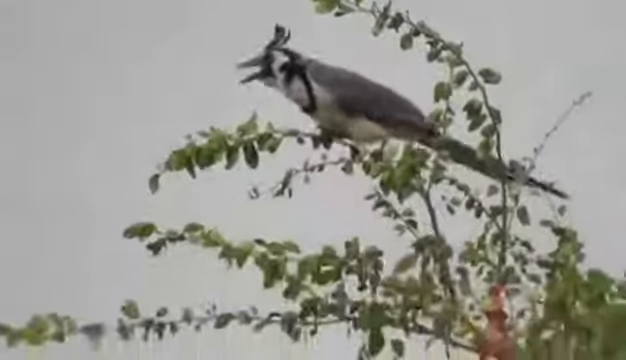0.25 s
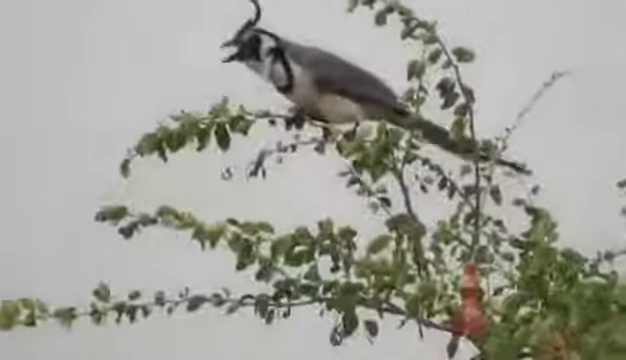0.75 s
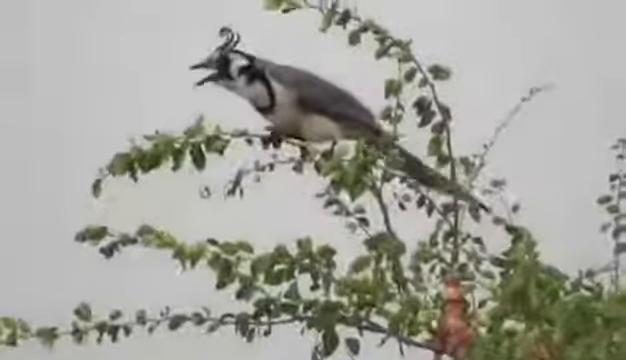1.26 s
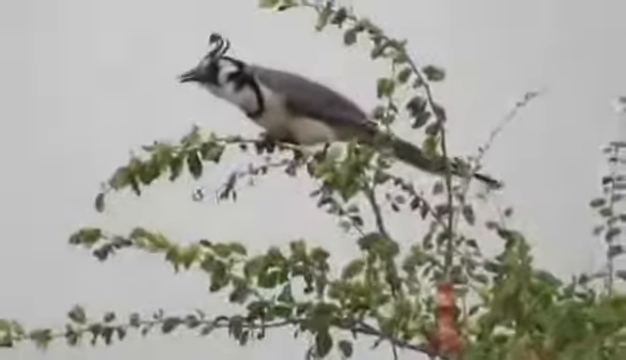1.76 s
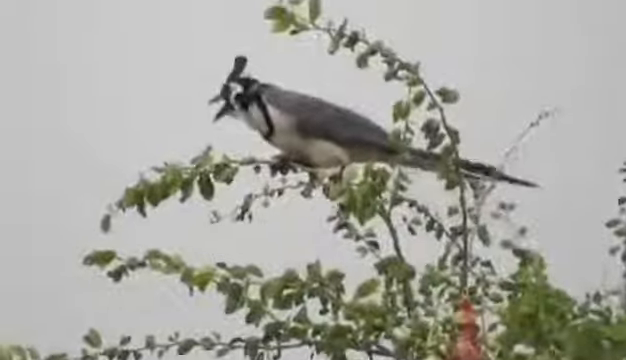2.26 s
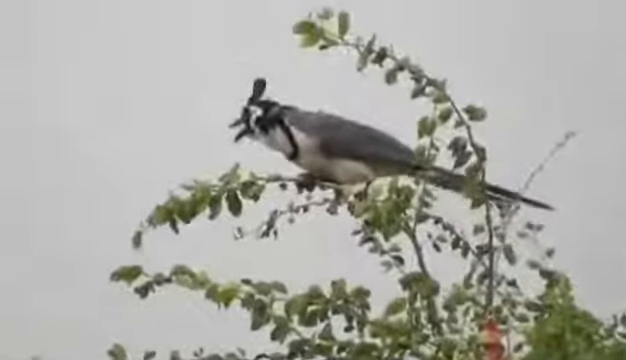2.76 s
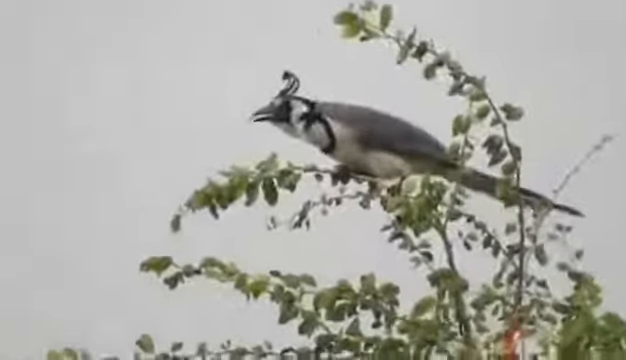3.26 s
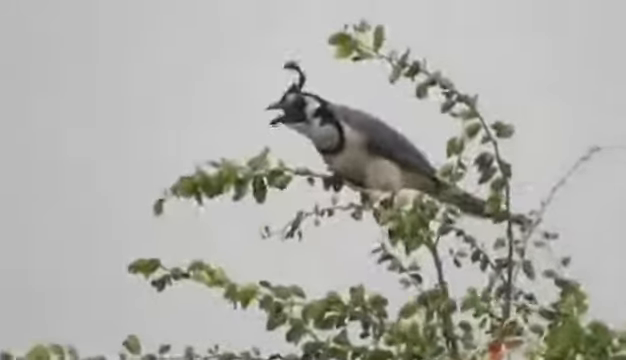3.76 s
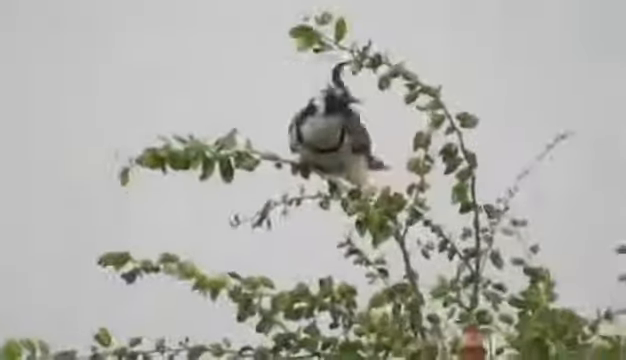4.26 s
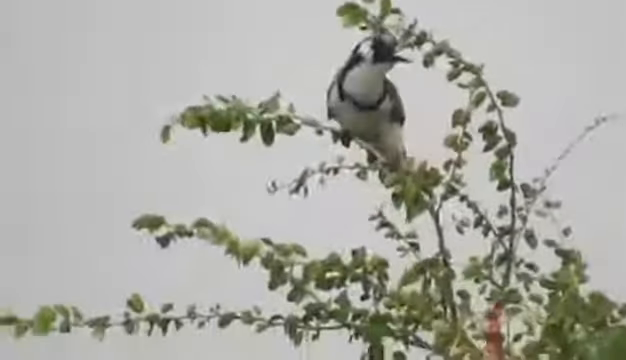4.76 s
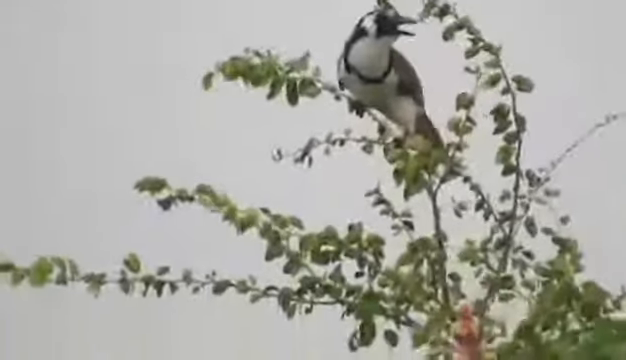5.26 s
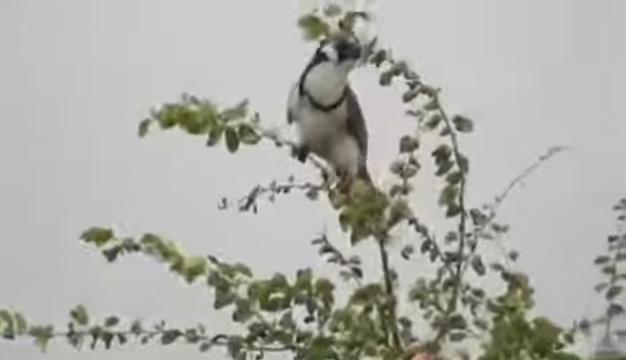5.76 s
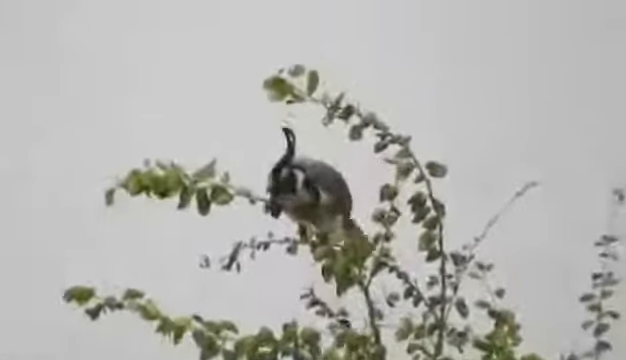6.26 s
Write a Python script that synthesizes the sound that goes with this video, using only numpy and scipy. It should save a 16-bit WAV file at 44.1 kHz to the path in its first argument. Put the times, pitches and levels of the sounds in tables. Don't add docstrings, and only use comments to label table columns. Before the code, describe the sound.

A jay on a treetop gives short, scratchy, nasal calls, each a whistle roughened by fast flutter and breath, with brief uneven pauses. A soft echo comes off the trees. Far insects hiss, machinery hums hollowly and traffic swells low. After about three seconds wind begins thudding and rumbling on the handheld microphone; the background sinks and the last calls become weaker.

```python
import sys
import numpy as np
from scipy import signal
from scipy.fft import rfft, irfft, next_fast_len
from scipy.io import wavfile
from scipy.ndimage import uniform_filter1d, map_coordinates

SR = 44100
rng = np.random.default_rng(int(sys.argv[2]) if len(sys.argv) > 2 else 0)


def undo_db(level):
    steps = np.asarray(level, float) / 20
    return 10 ** steps


def master(y):
    cut = np.clip(np.atleast_2d(y).T, -1, 1)
    pcm = np.round(cut * 32767)
    wavfile.write(sys.argv[1], SR, pcm.astype(np.int16))


N = 286650


def unit(x):
    return x / np.sqrt(np.mean(x ** 2) + 1e-20)


def along(points, hz):
    f, v = np.transpose(points)
    return np.interp(np.log(hz + 1), np.log(f + 1), v)


def curves(rows):
    s, *cols = np.transpose(rows)
    return [np.interp(np.arange(N) / SR, s, c) for c in cols]


def wobble(rate):
    return unit(map_coordinates(rng.standard_normal(N // 10), [np.arange(N) * rate / SR], order=1))


def filtered(x, response):
    m = next_fast_len(N + SR // 2)
    return irfft(rfft(x, m) * response(np.fft.rfftfreq(m, 1 / SR)), m)[..., :N]


def rush(response, patchy_db):
    z = signal.stft(rng.standard_normal(N), nperseg=512)[2]
    field = uniform_filter1d(rng.standard_normal(z.shape), size=5, axis=0)
    field = uniform_filter1d(field, size=10, axis=1)
    patchy = signal.istft(z * undo_db(patchy_db * unit(field)), nperseg=512)[1][:N]
    return unit(filtered(patchy, response))


def coloured(spectrum):
    return lambda hz: undo_db(along(spectrum, hz))


def dips(rows):
    return lambda hz: undo_db(-sum(db * np.exp(-((hz - c) / w) ** 2) for c, w, db in rows))


def hollow(modes):
    def response(f):
        return sum((-1) ** k * undo_db(db) * 1j * f * w / (c * c - f * f + 1j * f * w)
                   for k, (c, w, db) in enumerate(modes))
    return response


# t/s, length/s, whistle level/dB, top f/Hz, rasp over whistle level/dB
CALLS = [
    (-0.055, 0.34, -38, 2800, -0.5),
    (0.438, 0.27, -36.5, 2760, -1.5),
    (1.0, 0.27, -36, 2700, -1.5),
    (1.591, .279, -35.5, 2750, -3),
    (2.51, .31, -38, 2720, -2.5),
    (3.038, 0.28, -37.5, 2700, -5),
    (3.895, .315, -35, 2786, 0),
    (4.473, .287, -43.5, 2650, -3.5),
    (5.06, .26, -48, 2590, -1.5),
    (5.545, 0.26, -46, 2540, -6.5),
]


def phrasing(t):
    rows = np.array(CALLS)
    latest = np.clip(np.searchsorted(rows[:, 0], t + .01) - 1, 0, None)
    start, length, level_db, top_hz, rasp_over_db = rows[latest].T
    since = np.maximum(t - start, 0)
    rise_s, top_at = .11, .38
    before = np.clip(1 - since / rise_s, 0, 1)
    after = np.clip((since / length - top_at) / (1 - top_at), 0, 1)
    release = np.clip(1 - (length - since) / .063, 0, 1)

    def lead_in(attack_s):
        return np.clip(1 - since / attack_s, 0, 1)

    attack_s, start_pitch, end_hz = .035, .64, 2380
    climb = (1 - start_pitch) * before ** 2.5
    hang = .06 * np.sin(np.pi * lead_in(attack_s + .008))
    sag_hz = (top_hz - end_hz) * np.sin(np.pi / 2 * np.minimum(after / .85, 1)) ** 2
    hz = top_hz * (1 - climb - hang) - sag_hz
    tone_db = level_db - 12 * lead_in(attack_s) ** .35 - 2.5 * after ** 2 - 18.5 * release
    low_db = level_db - 7 - 8 * lead_in(.01) - 10.5 * release
    rasp_db = level_db + rasp_over_db - 10.5 * lead_in(.084) - 13.5 * after ** 2 - release
    return tone_db, hz, low_db, rasp_db


# multiple of the pitch, level/dB
OVERTONES = [(1, 0), (2, -11), (3, -29), (4, -29)]


def whistle(phase, tone_db, rasp_db, opening):
    strength = unit(opening * undo_db(1.6 * wobble(450) + .8 * wobble(70)))
    tone = undo_db(tone_db + 3.0) * np.sin(phase)
    for k, db in OVERTONES[1:]:
        tone = tone + undo_db(rasp_db + 10 + db + 1.5 * wobble(300)) * np.sin(k * phase)
    return strength * tone


LOW_VOICE = [(0, 0.74), (.5, 0.85), (1, 0.77)]


def low_voice(hz, bend, low_db, gone, cycle):
    low_hz = hz * np.interp(gone, *np.transpose(LOW_VOICE)) * (1 + 1.5 * bend + .03 * wobble(400))
    phase = 2 * np.pi * np.cumsum(low_hz) / SR
    entry = np.clip(2.2 * gone - .35, .25, 1)
    beats = unit(1 + .8 * np.cos(cycle - 2.2))
    return entry * undo_db(low_db + 1.5 + 2 * wobble(300)) * beats * (np.sin(phase) + .35 * np.sin(2 * phase))


# f/Hz, level/dB per Hz
RASP = [(900, -54), (1300, -9.5), (1900, -12), (2400, 0.5), (2900, -2.5), (3300, -7.5), (4100, -7),
        (5400, -6), (6300, -11), (7000, -16.5), (8700, -20.5), (9400, -25), (11000, -21.5), (15500, -45)]


def breath(rasp_db, gone, cycle):
    clicking = np.exp(-(gone / .14) ** 2)
    clicks = undo_db(16 * clicking * (np.cos(cycle) - 1) / 2 + 5.2 * clicking)
    puffs = unit(1 + 0.12 * np.cos(cycle + 2.2))
    return undo_db(rasp_db + 2.7) * clicks * puffs * rush(coloured(RASP), patchy_db=2.0)


# share of the call gone, beats f/Hz
FLUTTER = [(0, 140), (.4, 132), (1, 116)]
# f/Hz, width/Hz, depth level/dB
GROUND_DIPS = [(2150, 60, 6), (3050, 50, 4), (3480, 60, 10)]


def jay():
    t = np.arange(N) / SR
    tone_db, hz, low_db, rasp_db = phrasing(t)
    calling, gone = np.zeros(N), np.zeros(N)
    for start, length, *_ in CALLS:
        end = start + length
        calling += np.clip(np.minimum((t - start + .004) / .012, (end + .014 - t) / .03), 0, 1)
        gone += (t >= start) * (t < end + .1) * (1 - (end - t) / min(max(end - start, .24), .32))
    gone = np.clip(gone, 0, 1)

    beat_hz = np.interp(gone, *np.transpose(FLUTTER)) * (1 + .025 * wobble(60))
    cycle = 2 * np.pi * np.cumsum(beat_hz) / SR
    opening = 1 + (.75 - .35 * gone) * np.cos(cycle) + .2 * np.cos(2 * cycle + 2)
    slide = -(.027 + .04 * gone) * np.sin(cycle - .3)
    hoarseness = (.011 + .12 * np.exp(-(gone / .1) ** 2)) * wobble(500)
    bend = slide + hoarseness
    phase = 2 * np.pi * np.cumsum(hz * (1 + bend)) / SR

    voice = whistle(phase, tone_db, rasp_db, opening) + low_voice(hz, bend, low_db, gone, cycle)
    return filtered(calling * (voice + breath(rasp_db, gone, cycle)), dips(GROUND_DIPS))


# f/Hz, time to fall 60 dB t/s
TREES = [(1000, 0.15), (2600, 0.68), (5000, 0.69), (10000, 0.14)]


def trees(x):
    out = np.zeros(N + SR)
    for s, length, *_ in CALLS:
        start, end = round(max(s, 0) * SR), round((s + length + .03) * SR)
        hz, t, z = signal.stft(rng.standard_normal(SR), SR, nperseg=256)
        decay = undo_db(-60 * t / along(TREES, hz)[:, None])
        tail = signal.istft(z * decay, SR, nperseg=256)[1][:SR - 2000]
        wet = signal.fftconvolve(x[start:end], tail / np.linalg.norm(tail))
        out[start + 600:][:SR] += wet[:SR]
    return out[:N]


# f/Hz, level/dB per Hz
INSECTS = [(4350, -43), (7400, -18), (7730, -21), (8370, -3), (8930, 1), (9560, -12.5), (9900, -22.5),
           (10600, -37), (11200, -46), (12000, -35), (12900, -26.5), (14400, -29.5), (15600, -44)]


def insects(gain_db):
    level_db = -51 + gain_db + 1.2 * wobble(7.6) + 0.62 * wobble(150)
    return undo_db(level_db) * rush(coloured(INSECTS), patchy_db=2.1)


# f/Hz, width/Hz, level/dB
HUM = [(497, 29.4, -7), (572.6, 31.7, -4.5), (738.2, 25.1, 0.5), (850, 43, -7.5), (966.6, 36.4, -5)]


def hum(gain_db):
    def response(f):
        return hollow(HUM)(f) / (1 + (f / 1150) ** 8) / (1 + (420 / (f + 1)) ** 8)
    return undo_db(-49.9 + gain_db + 0.69 * wobble(3.795)) * rush(response, patchy_db=1.0)


# f/Hz, width/Hz, level/dB
DRONE = [(263, 23, -0.5), (305.5, 28, 2), (404, 370, -6.5)]
# t/s, level/dB, half length/s
PASSES = [
    (.65, 4.5, 0.13),
    (2.147, 6.5, 0.22),
    (3.751, 7, 0.31),
]


def drone(gain_db):
    t = np.arange(N) / SR
    swells_db = sum(db * np.exp(-((t - s) / half) ** 2) for s, db, half in PASSES)
    noise = rush(lambda f: hollow(DRONE)(f) / (1 + (f / 450) ** 6), patchy_db=2.0)
    return undo_db(-57.9 + gain_db + swells_db) * noise


# f/Hz, level/dB per Hz
AIR = [(590, -13), (1000, -4.5), (1280, -5.5), (1860, -8.5), (2190, -10), (2690, -6), (3690, -14.5),
       (3990, -15.5), (4540, -14.5), (5920, -14.5), (7800, -10), (10100, -14.5), (17200, -120)]


def air(gain_db):
    t = np.arange(N) / SR
    return undo_db(-52.73 + gain_db - 0.38 * t) * rush(coloured(AIR), patchy_db=3.0)


# t/s, level/dB
GAIN = [(0, -1), (.7, 0.5), (4.07, 0.5), (4.3, -1.5), (4.56, -9.5), (5.0, -8.5), (5.14, -12.5),
        (5.56, -12.5), (5.7, -11.5), (5.9, -9), (6.2, -11), (6.5, -11)]


def background():
    gain_db, = curves(GAIN)
    return insects(gain_db) + hum(gain_db) + drone(gain_db) + air(gain_db)


# t/s, strength level/dB, speed as flapping over rumble level/dB
WIND = [(0.0, -51, 6), (0.6, -50, 1.5), (1.85, -51.5, -1), (1.96, -44, 0), (2.06, -55, -3), (3.33, -52, 3),
        (3.39, -31.5, -8), (3.47, -42, -3), (3.98, -41, -3.5), (4.33, -30, -7), (4.38, -35, -4),
        (4.62, -30, 0.5), (4.76, -36.5, -8.5), (5.06, -30.5, 2.5), (5.55, -34, 4), (6.0, -28, 8),
        (6.27, -30.5, 10), (6.5, -40.5, 3)]
# f/Hz, level/dB per Hz
RUMBLE = [(12, -19), (22, -4.5), (43, 2), (65, -4.5), (100, -3), (140, -10.5), (200, -34.5), (300, -73)]
# f/Hz, level/dB per Hz
FLAPPING = [(70, 6), (110, -5.5), (160, -5.5), (250, -11.5), (350, -23), (500, -38), (900, -80)]
# t/s, peak level/dB, f/Hz
PUSHES = [(0.175, -26.5, 52), (1.939, -27.5, 43.5), (3.379, -25, 74.6), (3.556, -23, 62.4),
          (3.621, -26.5, 45.5), (3.668, -25, 64), (3.753, -28, 64), (3.843, -29, 65.5), (3.874, -30, 67.6),
          (4.086, -24, 81), (4.171, -20.5, 65.5), (4.244, -19.5, 54.9), (4.324, -17, 105),
          (4.524, -14.5, 96), (4.609, -22.5, 119), (4.642, -18.5, 93), (4.962, -16.5, 85),
          (5.061, -21.5, 100), (5.09, -22.5, 104), (5.202, -18.5, 98), (5.335, -19, 150),
          (5.376, -22, 119.5), (5.447, -22.5, 103), (5.604, -21.5, 121), (5.643, -26, 106),
          (5.817, -24, 133.8), (5.939, -23.5, 71), (6.026, -16.5, 107), (6.232, -17.5, 131),
          (6.315, -27, 117)]


def wind():
    strength_db, speed_db = curves(WIND)
    rumble_db = strength_db - 2 - speed_db / 2
    flap_db = -50.5 + speed_db / 2 + 1.94 * np.maximum(strength_db + 40.5, 0)
    lumps = wobble(22)
    rumble = unit(undo_db(1.2 * lumps) * rush(coloured(RUMBLE), patchy_db=-0.8))
    flapping = unit(undo_db(0.96 * lumps + 5.2 * wobble(60)) * rush(coloured(FLAPPING), patchy_db=2.5))
    out = undo_db(rumble_db) * rumble + undo_db(flap_db) * flapping
    t = np.arange(-SR // 20, SR // 20) / SR
    for s, db, hz in PUSHES:
        swing = -np.cos(2 * np.pi * hz * t - .3) * np.exp(-(2.22 * hz * t) ** 2)
        kink = -.2 * np.exp(-np.abs(t) / .0007)
        out[round(s * SR) - SR // 20:][:len(t)] += undo_db(db + 1.0) * (swing + kink)
    out = filtered(out, lambda f: 1 / np.sqrt(1 + (45 / (f + 1)) ** 2))
    return out / (1 + np.abs(out / .14) ** 4) ** (1 / 4)


# t/s, level/dB, length/s
KNOCKS = [
    (0.332, -37, 0.041),
    (0.459, -38.5, 0.036),
]
# f/Hz, level/dB
KNOCK_TONES = [(288, 1), (742, 5.5)]


def knocks():
    out = np.zeros(N)
    for s, db, length in KNOCKS:
        t = np.arange(round(length * SR)) / SR
        tones = sum(undo_db(level) * np.sin(2 * np.pi * hz * t) for hz, level in KNOCK_TONES)
        out[round(s * SR):][:len(t)] += undo_db(db - 5.5) * np.sin(np.pi * t / length) ** 0.98 * tones
    return out


# start t/s, end t/s, f/Hz, level/dB
WHINES = [
    (2.55, 2.78, 11050, -79),
    (3.08, 3.56, 10313, -69),
    (3.62, 3.81, 10313, -69),
    (3.86, 4.27, 10313, -65),
    (3.08, 3.3, 11800, -75),
    (3.36, 3.92, 11800, -85),
]


def lens():
    t = np.arange(N) / SR
    falter = undo_db(3 + 1.5 * wobble(40)) * np.clip(2.6 + 2 * wobble(16), 0, 1)
    out = np.zeros(N)
    for start, end, hz, db in WHINES:
        running = np.clip(np.minimum(t - start, end - t) / .01, 0, 1)
        out += undo_db(db) * running * np.sin(2 * np.pi * hz * t)
    return falter * out


def scene():
    bird = jay()
    return (bird + undo_db(-16.0) * trees(bird) + background() + wind() + knocks())[None]


# f/Hz, width/Hz, depth level/dB
NOTCHES = [(3930, 120, 11), (6350, 100, 3), (7870, 70, 25)]


def seams(x):
    return filtered(x, dips(NOTCHES))


# low f/Hz, high f/Hz, share of the time 0-1
MUTED = [(9850, 10650, .35), (10650, 11300, .62), (11300, 11750, .45), (11750, 12200, .15),
         (14500, 15100, .15), (15100, 15700, .72)]


def dropouts(x):
    hz, _, z = signal.stft(x, SR, nperseg=1024)
    power = np.abs(z) ** 2 + 1e-20

    def gate(ratio, share):
        return np.maximum(1 / (1 + (np.quantile(ratio, share) / ratio) ** 12), .02)

    def band(lo, hi, size):
        return uniform_filter1d(power[(hz >= lo) & (hz < hi)].mean(axis=0), size=size)

    chorus = band(8300, 9300, size=40)
    for lo, hi, share in MUTED:
        z[(hz >= lo) & (hz < hi)] *= gate(band(lo, hi, size=4) / chorus, share)
    patch = uniform_filter1d(uniform_filter1d(power, size=2, axis=0), size=4, axis=1)
    patch = np.log(np.abs(patch) + 1e-20)
    above_neighbours = np.exp(patch - uniform_filter1d(patch, size=30, axis=0))
    middle = (hz > 1400) & (hz < 9500)
    z[middle] *= gate(above_neighbours[middle], share=.06)
    return signal.istft(z, SR, nperseg=1024)[1][None, :N]


def roll_off(x):
    return signal.sosfilt(signal.butter(12, 15630, fs=SR, output="sos"), x)


def record(dry):
    mix = dropouts(seams(dry)[0]) + lens()
    return roll_off(mix)


dry = scene()
out = record(dry)
master(out)
```